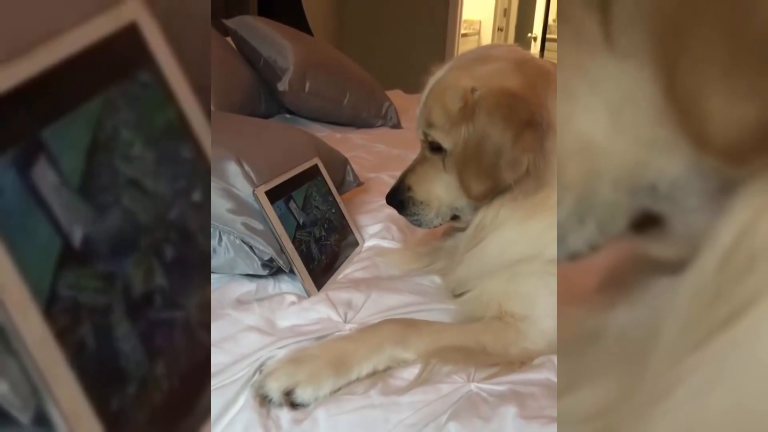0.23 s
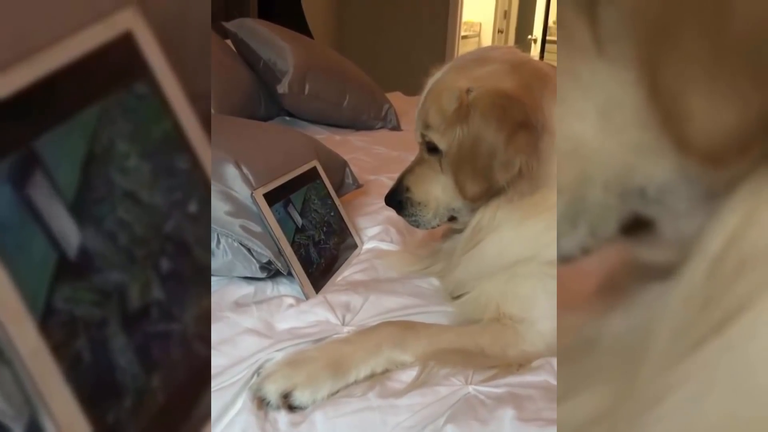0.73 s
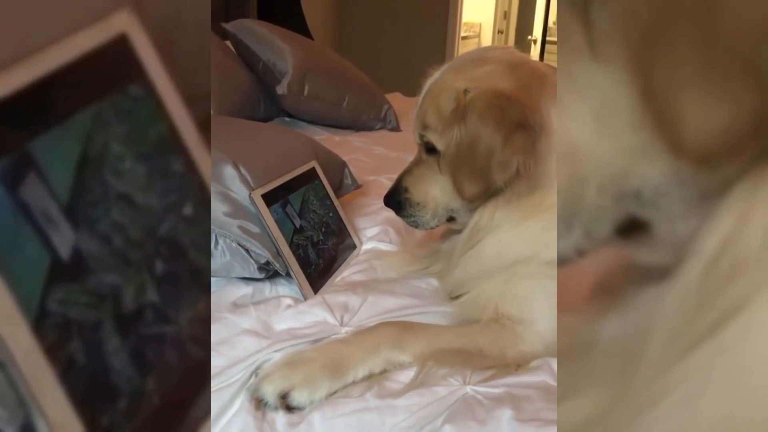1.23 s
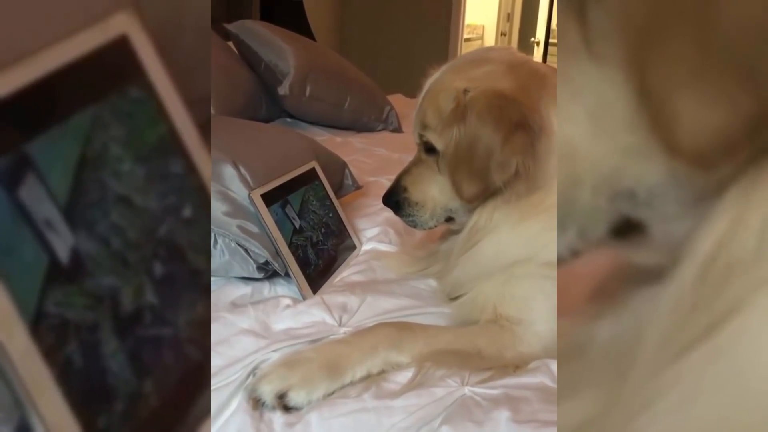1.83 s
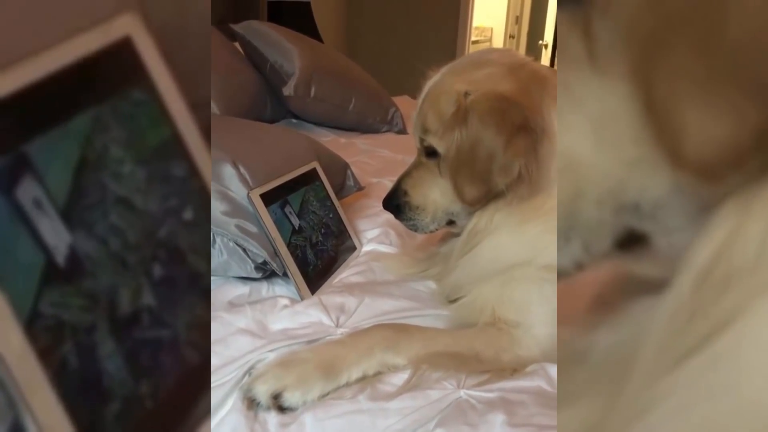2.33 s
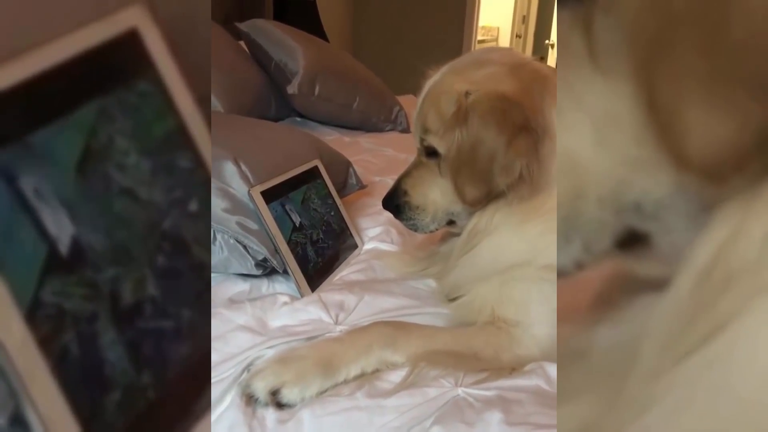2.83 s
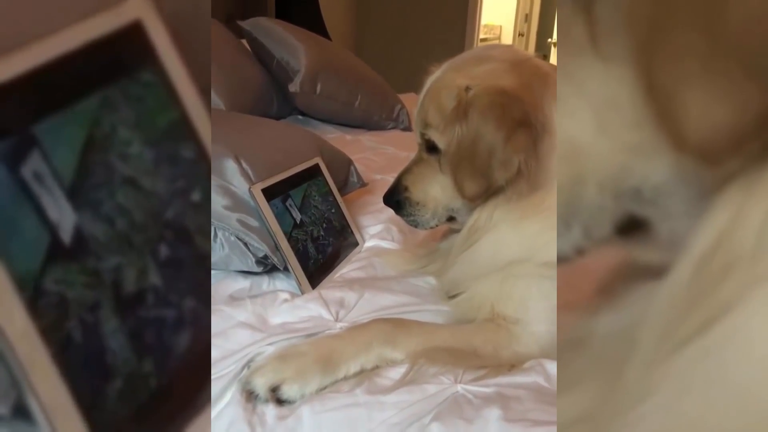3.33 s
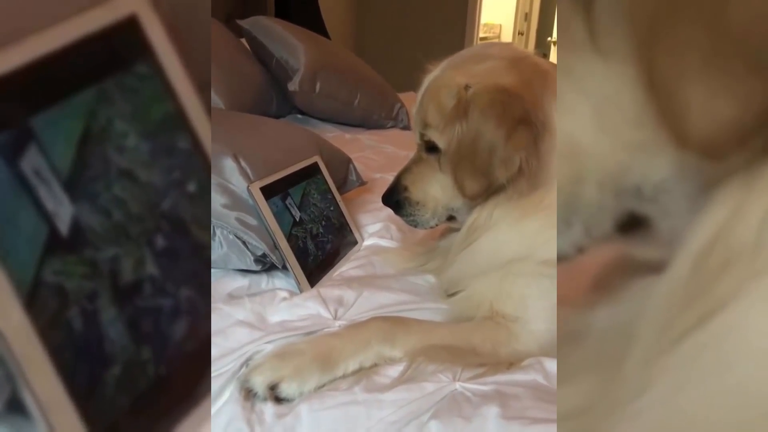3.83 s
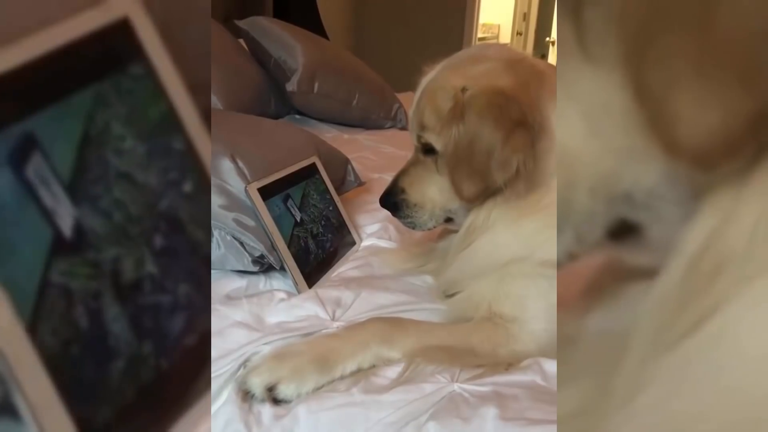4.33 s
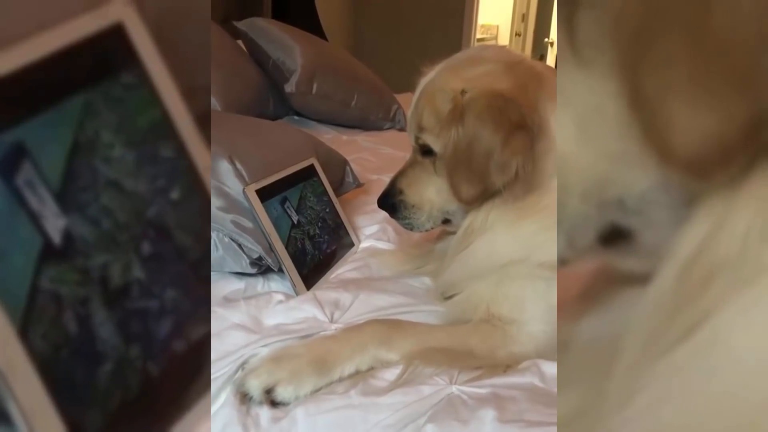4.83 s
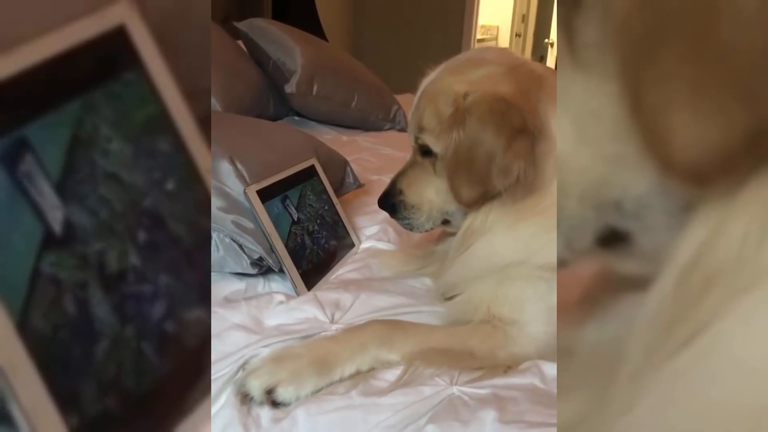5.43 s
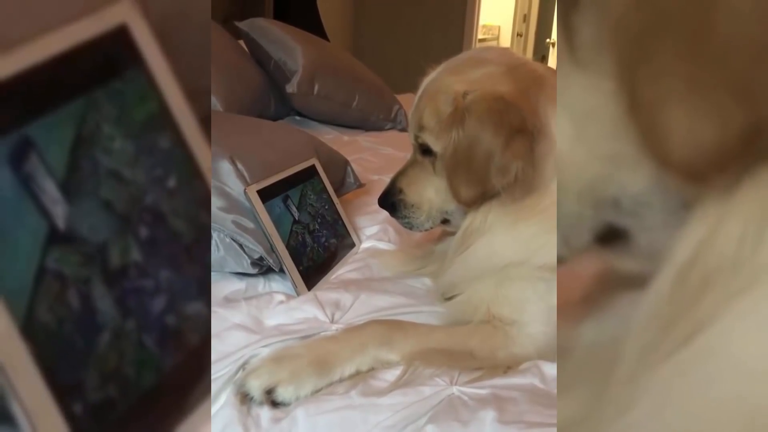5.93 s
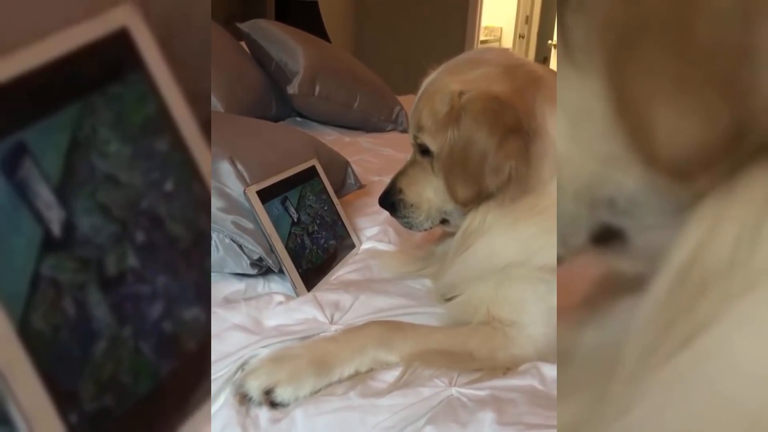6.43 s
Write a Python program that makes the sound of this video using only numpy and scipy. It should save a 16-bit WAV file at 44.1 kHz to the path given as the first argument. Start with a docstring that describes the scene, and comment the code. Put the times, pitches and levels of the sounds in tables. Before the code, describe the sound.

A quiet bedroom with a steady low fan hum and thin hiss, scattered with soft ticks, satin rustle and small wet mouth sounds from a resting dog.

```python
"""A quiet bedroom where a dog lies on satin bedding and watches a tablet, about 6.7 seconds.
Throughout, an appliance hums at twice the mains frequency, its fan moves air, a low rumble swells and hiss lies on top.
From 0.4 s ticks, taps and satin rustle come from mouth and bedding: sharp cracks and short decaying rings.
At 2 s a wet lip pops and the hiss settles lower; at 2.8 s the throat gurgles with short, falling tones.
Around 3 s the hiss dips briefly; the last tick comes near 5.8 s."""
import sys
import numpy as np
from scipy import signal
from scipy.fft import rfft, irfft, next_fast_len
from scipy.io import wavfile
from scipy.ndimage import map_coordinates

SR = 44100
rng = np.random.default_rng(int(sys.argv[2]) if len(sys.argv) > 2 else 0)


def generate_wav(sig):
    """Save sig (samples, or channels by samples) to the path in sys.argv[1] as 16-bit PCM at SR."""
    pcm = np.round(np.clip(np.atleast_2d(sig).T, -1, 1) * 32767).astype(np.int16)
    wavfile.write(sys.argv[1], SR, pcm)


N = 294014  # length in samples


def amp(db):
    """Turn decibels into a gain."""
    return 10 ** (np.asarray(db) / 20)


def unit(x):
    """Scale a sound to an rms (average strength) of 1."""
    return x / np.sqrt(np.mean(x ** 2) + 1e-20)


def along(points, hz):
    """Read a curve of (Hz, value) points on a logarithmic frequency axis."""
    point_hz, values = np.transpose(points)
    return np.interp(np.log(hz + 1), np.log(point_hz + 1), values)


def curves(rows):
    """Draw straight lines between timed rows: one curve for each column after the time."""
    seconds, *columns = np.transpose(rows)
    return [np.interp(np.arange(N) / SR, seconds, column) for column in columns]


def wobble(rate):
    """Make a smooth random curve with `rate` random points a second."""
    knots = rng.standard_normal(int(N * rate / SR) + 4)
    return map_coordinates(knots, [np.arange(N) * rate / SR])


def filtered(x, response):
    """Multiply each frequency of x by the gain that response gives it."""
    size = next_fast_len(len(x) + 8192)
    spectrum = rfft(x, size) * response(np.fft.rfftfreq(size, 1 / SR))
    return irfft(spectrum, size)[:len(x)]


def rush(spectrum):
    """Make noise of rms 1 with the given spectrum, falling away above its last point."""
    last_hz = spectrum[-1][0]

    def response(hz):
        skirt = 1 / (1 + (hz / (2 * last_hz)) ** 4)
        return amp(along(spectrum, hz)) * skirt

    return unit(filtered(rng.standard_normal(N), response))


def bell(hz, centre_hz, octaves):
    """Give a smooth band around a centre frequency."""
    return np.exp(-.5 * (np.log2((hz + 1) / centre_hz) / octaves) ** 2)


def add(track, s, sound):
    """Mix a short sound into a track at time s."""
    start = round(s * SR)
    track[start:start + len(sound)] += sound[:N - start]


def tone(hz, drift):
    """Make a sine of rms 1 whose phase is shifted by drift radians."""
    cycles = np.cumsum(hz * np.ones(N)) / SR + rng.random()
    return np.sqrt(2) * np.sin(2 * np.pi * cycles + drift)


def causal(gain, size):
    """Make the sharp-fronted (minimum-phase) pulse that has the given spectrum, peak 1."""
    gains = gain(np.fft.rfftfreq(2 * size, 1 / SR))
    cepstrum = irfft(np.log(np.maximum(gains, 1e-3)))
    # Folding the second half onto the first packs the energy at the front.
    cepstrum[1:size] *= 2
    cepstrum[size + 1:] = 0
    pulse = irfft(np.exp(rfft(cepstrum)))[:size]
    return pulse / np.abs(pulse).max()


def ringing(modes, t, weight):
    """Sum decaying modes, each weighted by its frequency and a little different at every contact."""
    total = np.zeros(len(t))
    for hz, db, t60 in modes:
        fade = amp(db + rng.normal(0, 1) - 60 * t / t60)
        total += fade * weight(hz) * np.sin(2 * np.pi * (hz * t + rng.random()))
    return total


# Low rumble noise in the room's deepest resonances.
# Each row: frequency in Hz, relative strength in dB per Hz.
RUMBLE_SPECTRUM = [(20, -46), (38, -9), (55, -8), (74, -8.5), (86, 5), (98, -9.5), (118, -1), (140, -13),
                   (160, -4.5), (190, -13), (260, -28)]
# Swells of the rumble. Each row: start in seconds, length in seconds, highest rise over the resting level in dB.
RUMBLE_SWELLS = [(0.0, 0.46, 14), (0.797, 0.71, 17), (1.12, 0.38, 17.5), (1.402, 0.43, 15.5),
                 (1.804, 0.31, 18), (3.35, 0.84, 11), (4.45, 0.33, 12), (5.05, 0.68, 10), (6.25, 0.6, 9)]
RUMBLE_DB, SWELL_RISE_S = -68, 0.16  # resting level, time to reach the top of a swell


def rumble():
    """Noise in the room's deepest resonances; each swell rises quickly and ebbs for the rest of its length."""
    t = np.arange(N) / SR
    swells = []
    for s, length, db in RUMBLE_SWELLS:
        shape = np.interp(t - s, [0, SWELL_RISE_S, length], [0, 1, 0]) ** .5
        swells.append(db * shape)
    swell_db = np.max(swells, axis=0)  # the strongest swell wins
    return amp(RUMBLE_DB + swell_db) * rush(RUMBLE_SPECTRUM)


# Mains hum. Each row: multiple of the hum pitch, rms level in dB.
HUM_PARTIALS = [(1, -54), (2, -57), (3, -72)]
HUM_HZ = 120
# Faint fan tones. Each row: frequency in Hz, rms level in dB.
FAN_TONES = [(59, -69.5), (85, -77), (117, -66), (173, -67), (615, -88), (726, -69), (755, -71.5),
             (3094, -76.5)]


def appliance():
    """Steady magnetic hum, with the less steady tones of the fan; the higher ones waver faster."""
    hum = sum(amp(db) * tone(k * HUM_HZ, 0) for k, db in HUM_PARTIALS)
    whine = sum(amp(db) * tone(hz, 0.96 * wobble(7 + hz / 180)) for hz, db in FAN_TONES)
    return hum + whine


# Noise of moving air. Each row: frequency in Hz, relative strength in dB per Hz.
AIR_SPECTRUM = [(18, -47), (27, -24), (38, -3), (60, -0.5), (85, -8.5), (125, -1.5), (170, -2.5),
                (205, -5.5), (240, -2.5), (265, -1), (310, -3.5), (345, -8.5), (390, -11), (640, -10),
                (900, -17), (1600, -24.5), (3000, -41)]


def fan_air():
    """Turbulent air from the fan murmurs through the room, its level gently unsteady."""
    return amp(-54.0 + 0.85 * wobble(6.2)) * rush(AIR_SPECTRUM)


# Resonance of the fan housing. Each row: frequency in Hz, relative strength in dB per Hz.
HOUSING_SPECTRUM = [(600, -51), (650, -27), (690, -7), (742, 3.5), (800, -8.5), (880, -29.5)]
# How loud the housing is. Each row: time in seconds, level in dB before a small random wobble.
HOUSING_LEVELS = [(0.0, -60.5), (2.93, -59.5), (2.98, -89), (3.05, -62.5), (3.7, -61.5), (3.79, -53),
                  (3.88, -62), (5.5, -59.5), (6.4, -57.5)]


def fan_housing():
    """The moving air sings in the resonance of the fan housing."""
    level_db, = curves(HOUSING_LEVELS)
    return amp(level_db + wobble(3.55)) * rush(HOUSING_SPECTRUM)


def among_walls(x, ripple_db=2):
    """Reflections give a steady sound a fixed fine ripple of peaks and dips over frequency."""
    ripple = rng.standard_normal(900)
    ripple_hz = np.linspace(0, SR / 2, len(ripple))
    return unit(filtered(x, lambda hz: amp(ripple_db * np.interp(hz, ripple_hz, ripple))))


# The hiss starts louder and settles around one moment.
HISS_START_DB, HISS_REST_DB, SETTLE_AT_S, SETTLE_S = -59, -61.5, 2.14, 0.18
# It dips once: middle and half-width in seconds, depth in dB.
DIP_AT_S, DIP_S, DIP_DB = 3.05, 0.092, -5


def hiss_level():
    """The main hiss level in dB settles lower and later dips once, briefly."""
    t = np.arange(N) / SR
    settled = (1 + np.tanh((t - SETTLE_AT_S) / SETTLE_S)) / 2
    dip_db = DIP_DB * np.exp(-((t - DIP_AT_S) / DIP_S) ** 2)
    return HISS_START_DB + (HISS_REST_DB - HISS_START_DB) * settled + dip_db


# Thin hiss. Each row: frequency in Hz, relative strength in dB per Hz.
HISS_SPECTRUM = [(900, -19.5), (2100, -2.5), (2850, -4.5), (3150, -1), (4100, 3), (5000, -1.5),
                 (5170, -28.5), (5750, -23), (6050, -8), (6700, -10.5), (7400, -17.5), (10500, -20),
                 (12200, -13.5), (13800, -24.5)]


def hiss():
    """Thin, flickering noise whose main part settles and dips, while its highest part does neither."""
    flickering = amp(0.84 * wobble(21.04)) * rush(HISS_SPECTRUM)
    top = filtered(flickering, lambda hz: hz > 7400)
    main = among_walls(flickering - top)
    return amp(hiss_level()) * main + amp(-61.0) * top


def room(x, t60=0.17):
    """A furnished bedroom answers with a short, diffuse echo; t60 is its 60 dB fade in seconds."""
    t = np.arange(SR // 3) / SR
    tail = rng.standard_normal(len(t)) * amp(-60 * t / t60) * (1 - np.exp(-t / 0.0011))
    return signal.fftconvolve(x, tail / np.linalg.norm(tail))[:N]


# Dull taps. Each row: time in seconds, overall level in dB, upper edge of the sound in Hz.
DULL_TAPS = [(1.111, -50, 3200), (1.3133, -44.5, 2980), (1.59, -54, 1900), (3.2296, -42, 850),
             (4.808, -44, 3600), (4.822, -53, 4200)]
# The hollow body that the taps sound.
# Each row: frequency in Hz, typical relative level in dB, time to fade by 60 dB in seconds.
HOLLOW_MODES = [(550, -5, .03), (724, 2, 0.037), (1073, 2, 0.045), (1293, 4.5, 0.043), (1500, 4, 0.031),
                (1880, 2, 0.037), (2500, -3, 0.045), (2840, 5.5, 0.033), (3070, 5.5, 0.07)]


def taps(ring_db=-9, scuff_db=-8, scuff_t60=0.021, attack=0.00047):
    """Padded contacts ring a small hollow body with a brief scuff; a lower edge leaves only its low modes."""
    track, t = np.zeros(N), np.arange(SR // 10) / SR
    for s, db, edge_hz in DULL_TAPS:
        padding = lambda hz: 1 / (1 + (hz / edge_hz) ** 6)
        scuff_colour = lambda hz: padding(hz) * bell(hz, 1400, 0.82)
        scuff = unit(filtered(rng.standard_normal(len(t)), scuff_colour))
        ring = amp(ring_db) * ringing(HOLLOW_MODES, t, padding)
        sound = ring + amp(scuff_db - 60 * t / scuff_t60) * scuff
        add(track, s, amp(db) * (1 - np.exp(-t / attack)) * sound)
    return track


# Spells of shifting satin.
# Each row: start in seconds, end in seconds, typical crack peak in dB, typical centre frequency in Hz.
SATIN_SPELLS = [(0.919, 1.881, -51.5, 3080), (1.269, 1.34, -44, 3100), (1.639, 1.73, -45, 3300),
                (2.906, 2.931, -46, 2700), (3.239, 3.34, -50.5, 2140), (4.576, 4.69, -50, 2500)]
# Crackles a second, and how far each may stray either way in level and pitch.
RUSTLE_PER_S, RUSTLE_SPREAD_DB, RUSTLE_OCTAVES = 80, 1.5, 0.33
RUSTLE_WIDTH_OCTAVES, RUSTLE_T60_S, RUSTLE_RING_DB = 0.78, 0.013, -15.5


def rustle():
    """Shifting satin crackles finely, loosely spread over each spell: rows like those of the ticks."""
    rows = []
    for start, end, db, centre_hz in SATIN_SPELLS:
        slip, size, pitch = rng.uniform(-1, 1, (3, RUSTLE_PER_S * 2))  # enough for two seconds
        times = start + (np.arange(len(slip)) + (1 + slip) / 2) / RUSTLE_PER_S
        levels = db + RUSTLE_SPREAD_DB * size
        pitches = centre_hz * 2 ** (RUSTLE_OCTAVES * pitch)
        for s, level, hz in zip(times, levels, pitches):
            if s < end:
                rows.append((s, level, hz, RUSTLE_WIDTH_OCTAVES, RUSTLE_T60_S, RUSTLE_RING_DB))
    return rows


# Soft ticks. Each row: time in seconds, peak of the crack in dB, centre frequency in Hz, width in octaves,
# time for the fizz to fade by 60 dB in seconds, level of the ring against the crack in dB.
SOFT_TICKS = [(.405, -42, 3400, .8, .02, -14), (.409, -38.5, 3400, .8, .018, -14),
              (.4134, -40.5, 2100, 0.75, .018, -7), (.959, -44.5, 3300, 0.23, .018, -14),
              (1.2245, -41, 4440, .5, .013, -18), (1.2908, -35.5, 3600, 0.65, 0.013, -18),
              (1.2945, -43, 4300, 0.54, .01, -18), (1.3156, -41, 1800, 1.6, .014, -25),
              (1.4348, -36, 2900, .7, 0.025, -16), (1.436, -37, 2800, 0.85, .016, -11),
              (1.594, -44, 2300, .8, .025, -14), (1.6507, -38.5, 2500, .8, .014, -11),
              (1.7024, -37.5, 2600, 1.2, 0.02, -19), (1.7131, -40, 4000, .6, .018, -16),
              (1.7171, -43, 4100, .5, .014, -16), (1.7665, -44, 3800, 0.65, .016, -14),
              (1.7784, -35.5, 3570, 0.53, 0.026, -12), (1.7819, -43, 3600, .6, .014, -16),
              (1.8555, -40, 4070, 0.79, .016, -17), (2.9007, -35, 2770, .8, 0.02, -11),
              (2.9112, -43, 3300, .8, .02, -14), (2.9185, -44, 2360, 0.14, .06, 1),
              (2.9205, -42, 4660, 0.56, 0.019, -12), (2.929, -48, 2420, 0.22, 0.044, -5),
              (2.9603, -41.5, 3900, .6, .02, -13), (3.2282, -36.5, 3380, 0.88, 0.023, -7),
              (3.2297, -36.5, 2055, .28, .035, -3.5), (3.2318, -43, 2500, .6, .025, -11),
              (3.2412, -49, 4700, .8, .016, -14), (3.2542, -50, 4200, .7, .012, -16),
              (3.29, -53, 2050, .3, .04, -7), (3.602, -48, 2400, 0.36, 0.076, -13),
              (4.615, -49.5, 2170, .25, .04, -11), (4.638, -39, 2500, .8, .019, -19),
              (4.8082, -42, 1800, 1.4, .012, -20), (4.8112, -43, 1900, 1.3, 0.013, -22),
              (5.759, -49, 2280, .2, .033, -6)]
# Colour of the crack and its fizz. Each row: frequency in Hz, relative strength in dB.
CRACK_COLOUR = [(500, 15), (1500, -1.5), (2150, 1), (2700, -3.5), (3450, 0.5), (3900, 0), (4500, 3.5),
                (5000, 0), (5300, -36), (5750, -24), (6100, -2.5), (6700, -1.5), (7400, -12.5), (9000, -13),
                (13000, -28)]
# What the ticks ring with.
# Each row: frequency in Hz, typical relative level in dB, time to fade by 60 dB in seconds.
RING_MODES = [(1500, -13, .025), (1934, -8, 0.05), (2080, -2, 0.06), (2317, -5, 0.047), (2695, -6, 0.036),
              (3060, -3, 0.033), (3420, -1, 0.032), (4300, -5, 0.038), (6700, -16, .012)]


def ticks(fizz_db=-11, attack=0.00073, ring_width=0.36):
    """Each tick or satin crackle is a sharp crack with a brief fizz, ringing the modes nearest its pitch."""
    track, t = np.zeros(N), np.arange(SR // 14) / SR
    for s, db, centre_hz, octaves, t60, ring_db in list(SOFT_TICKS) + rustle():
        colour = lambda hz: bell(hz, centre_hz, octaves) * amp(along(CRACK_COLOUR, hz))
        nearness = lambda hz: bell(hz, centre_hz, ring_width * octaves)
        crack = causal(colour, size=len(t))
        fizz = amp(fizz_db - 60 * t / t60) * unit(filtered(rng.standard_normal(len(t)), colour))
        ring = amp(ring_db) * ringing(RING_MODES, t, nearness)
        add(track, s, amp(db) * (crack + (1 - np.exp(-t / attack)) * (fizz + ring)))
    return track


# A wet lip pop. Each row: time in seconds, level in dB before a small boost, pitch in Hz,
# time for the ring to fade by 60 dB in seconds.
LIP_POPS = [(1.9987, -34, 3160, 0.018)]


def pops():
    """A film of saliva bursts and briefly rings a tiny cavity."""
    track, t = np.zeros(N), np.arange(SR // 20) / SR
    for s, db, hz, t60 in LIP_POPS:
        ring = np.sin(2 * np.pi * hz * t) + amp(-24) * np.sin(2 * np.pi * 2.5 * hz * t)
        burst = amp(-3.0 - 60 * t / 0.0069) * np.sin(2 * np.pi * 0.85 * hz * t)
        onset = 1 - np.exp(-t / 0.00072)
        add(track, s, amp(db + 2.5) * onset * (amp(-60 * t / t60) * ring + burst))
    return track


# Bubbles of the gurgle. Each row: start in seconds, peak level in dB, starting pitch in Hz.
BUBBLES = [(2.8, -47.5, 730), (2.825, -48.5, 638), (2.824, -54, 779), (2.843, -50.5, 792),
           (2.846, -53, 570), (2.858, -54, 754), (2.87, -45.5, 663), (2.893, -51, 767), (2.909, -51.5, 772),
           (2.886, -48, 600), (2.912, -51, 594)]
BUBBLE_S, BUBBLE_RISE_S = 0.034, 0.0055  # whole length and rise time
BUBBLE_SAG_HZ_PER_S, BUBBLE_WAVER = 990, 0.42  # fall in pitch, typical phase waver in radians


def gurgle():
    """Overlapping pockets of air in the throat each swell, waver, sink in pitch and fade."""
    track, t = np.zeros(N), np.arange(SR // 10) / SR
    swell = np.interp(t, [0, BUBBLE_RISE_S, BUBBLE_S], [0, 1, 0]) ** .5
    for s, db, start_hz in BUBBLES:
        hz = start_hz - BUBBLE_SAG_HZ_PER_S * t
        waver = BUBBLE_WAVER * wobble(127)[:len(t)]
        cycles = np.cumsum(hz) / SR + rng.random()
        add(track, s, amp(db) * swell * np.sin(2 * np.pi * cycles + waver))
    return track


def scene():
    """The small near sounds and their echo lie over the steady room."""
    clicks = ticks() + taps()
    wet = pops() + gurgle()
    echo = room(amp(-8) * clicks + amp(-11) * wet)
    background = rumble() + appliance() + fan_air() + fan_housing() + hiss()
    return (clicks + wet + echo + background)[None]


TOP_HZ = 14000


def record(dry):
    """The phone keeps nothing above its band limit."""
    return np.array([filtered(x, lambda hz: hz < TOP_HZ) for x in dry])


dry = scene()
out = record(dry)
generate_wav(out)
```